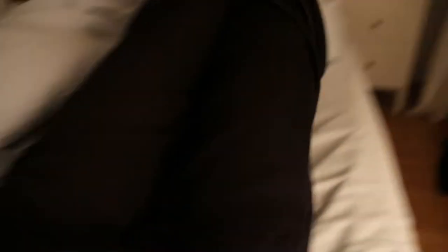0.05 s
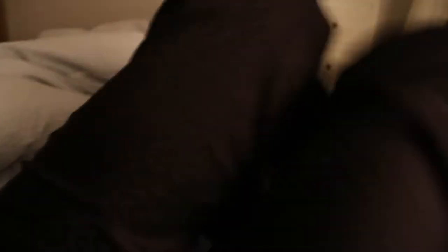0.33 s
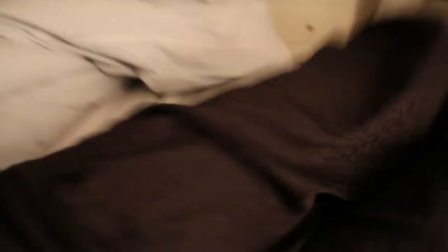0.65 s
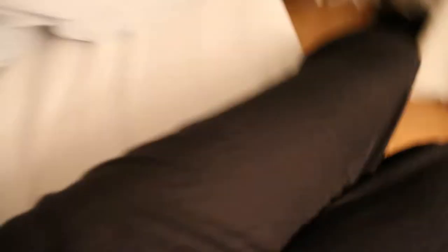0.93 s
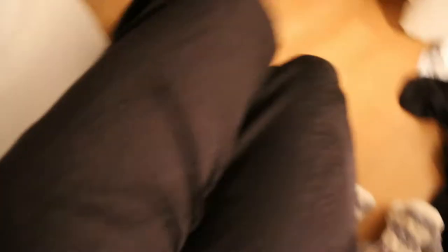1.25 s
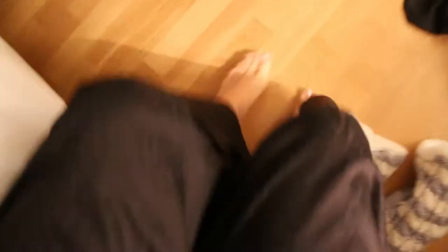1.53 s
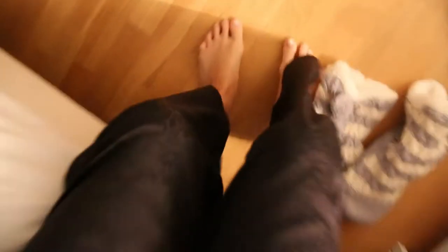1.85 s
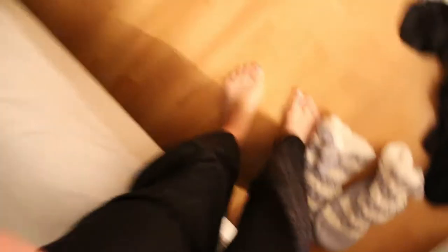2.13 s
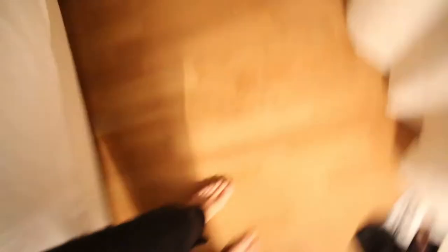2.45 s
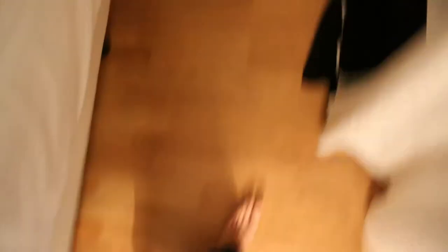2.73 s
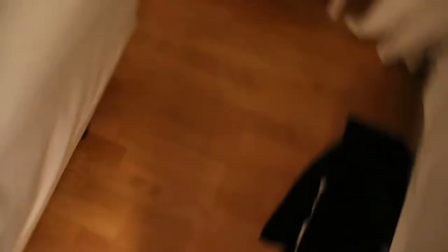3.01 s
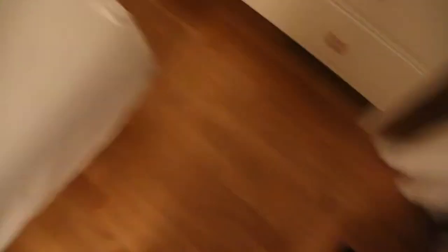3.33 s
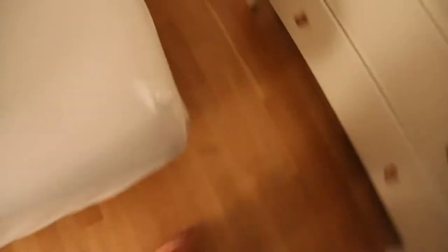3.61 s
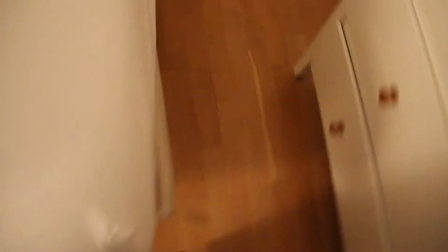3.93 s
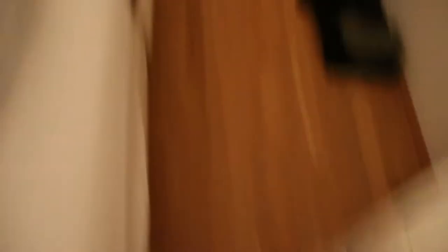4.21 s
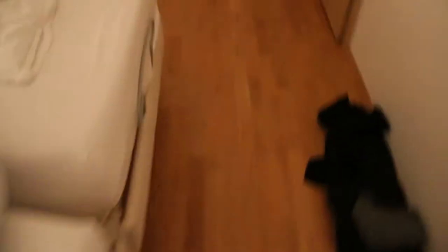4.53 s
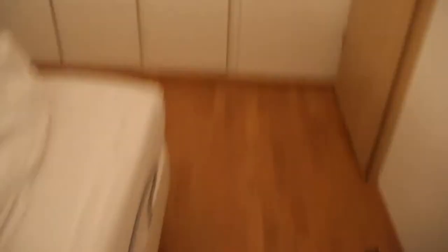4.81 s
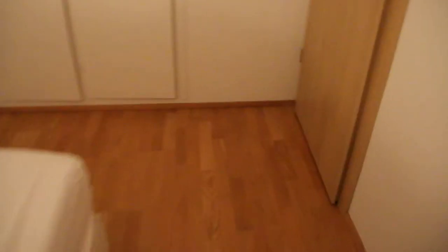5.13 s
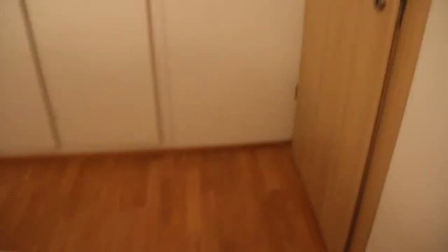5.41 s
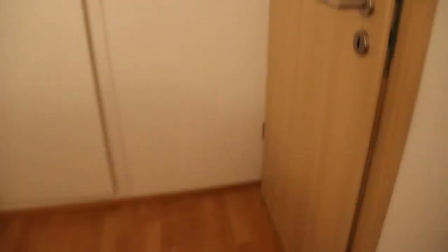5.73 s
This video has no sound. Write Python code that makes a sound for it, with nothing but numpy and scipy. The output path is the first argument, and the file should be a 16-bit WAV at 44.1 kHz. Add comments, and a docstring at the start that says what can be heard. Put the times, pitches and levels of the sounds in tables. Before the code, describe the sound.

Cloth rustles as someone slides off a duvet, then soft barefoot steps and brushing trousers, with close handling clicks and knocks.

```python
"""In a small, quiet bedroom someone slides off a duvet: folds flop and swish, and a knee zips over the weave.
From 0.6 s the camera in their hand ticks, knocks and scrapes under the fingers, close to its two
microphone ports. Bare feet load the sprung wooden floor as they stand up. The duvet dies away, and from
about 2.8 s trouser legs brush with the walk. At 3.4 s a strap ring tinkles once and the buckle hits
the housing; the soft steps and the handling carry on to the end."""
import sys
import numpy as np
from scipy import signal
from scipy.fft import rfft, irfft, next_fast_len
from scipy.io import wavfile
from scipy.ndimage import map_coordinates

SR = 44100
rng = np.random.default_rng(int(sys.argv[2]) if len(sys.argv) > 2 else 0)


def output_pcm(signal):
    """Save a mono or channel-first signal as 16-bit PCM at the path in sys.argv[1].

    Samples are clipped to [-1, 1] before scaling.
    """
    pcm = np.clip(np.atleast_2d(signal).T, -1, 1) * 32767
    wavfile.write(sys.argv[1], SR, np.round(pcm).astype(np.int16))


N = 262836

# Noise colours. Each row: frequency in Hz, relative spectral level in dB.
ROOM_TONE_EQ = [(25, -7), (60, -4.5), (130, -3.5), (265, -2), (380, -4.5), (520, -3.5), (800, -7),
                (1500, -12.5), (4000, -12.5), (9000, -16), (16000, -25.5)]  # room tone and hiss
FOLD_EQ = [(30, -30), (60, -5), (115, -4), (160, -5.5), (215, -1.5), (330, -4), (480, -3.5), (750, -9.5),
           (1300, -14), (3000, -38)]  # soft, tumbling folds
WEAVE_EQ = [(250, -24), (600, -4), (1000, -1), (1500, -2.5), (2200, -1), (3500, -5.5), (5500, -15),
            (9000, -41), (16000, -46)]  # weave rubbing on weave
FIBRE_EQ = [(1500, -21), (4000, 5.5), (6000, 4.5), (9000, 1), (12000, -3), (16000, -13)]  # the fizz of loose fibres
GRIP_EQ = [(60, -30), (130, -3.5), (230, 2.5), (400, -6), (900, -1.5), (1500, -4.5), (2000, -7), (3400, -2),
           (4300, -8), (6200, -14), (8000, -15.5), (11000, -28.5), (16000, -37)]  # skin on the camera body
BOARD_EQ = [(20, -25), (40, -14), (65, -1), (110, -5), (170, -37), (300, -18), (900, -23), (3000, -67)]  # rumbling floorboards
# Stereo images. Each row: frequency in Hz, left-right likeness (1 is mono, 0 is fully wide).
ROOM_TONE_IMAGE = [(100, 0.58), (400, 0.59), (1500, 0.075), (5000, 0)]
AIR_IMAGE = [(100, 0.99), (500, 0.98), (1200, 0.85), (2500, 0.44), (5000, 0.021), (12000, .02)]  # sound through the air
BODY_IMAGE = [(200, .94), (700, .85), (1500, .5), (3000, .03), (8000, .22)]  # sound through the housing
# The slide off the duvet. Each row: time in seconds, sliding speed as dB, weight on the folds as dB.
DUVET_SLIDE = [(0, -47.5, -48), (.2, -45, -49.5), (.35, -45.5, -50), (.5, -47.5, -45), (.7, -47.5, -45),
               (.95, -44.5, -44.5), (1.12, -47.5, -44.5), (1.23, -55.5, -48), (1.55, -50, -46.5),
               (1.76, -42.5, -41), (1.95, -46.5, -46), (2.04, -52.5, -54), (2.2, -55, -54.5),
               (2.45, -61.5, -73), (2.7, -70, -85)]
# A knee dragging over the ribbed weave. Each row: time in seconds, pitch in Hz, level in dB.
KNEE_ZIP = [(.08, 2300, -66), (.18, 2450, -52), (.28, 2590, -47), (.34, 2630, -48.5), (.42, 2480, -56),
            (.5, 2300, -90)]
# Single folds of cloth. Each row: start in seconds, length in seconds, level in dB, centre in Hz.
FOLD_SWISHES = [(0.119, 0.21, -46.5, 169), (0.246, 0.26, -46.5, 4780), (.468, 0.043, -43, 212),
                (0.823, 0.069, -37.5, 180), (1.229, .1, -46.5, 425), (1.457, 0.063, -45, 230),
                (1.451, .085, -49, 9500), (1.545, 0.056, -45.5, 252), (3.205, 0.08, -50.5, 5700),
                (3.718, 0.071, -48, 308), (3.767, 0.081, -48.5, 6400), (4.258, 0.21, -49, 1800),
                (5.305, 0.089, -48.5, 3960), (5.868, 0.059, -48.5, 807)]
# Dry plastic ticks. Each row: start in seconds, level in dB, centre in Hz, 60 dB decay in seconds.
PLASTIC_TICKS = [(0.6104, -33, 4260, 0.02), (0.7708, -42, 4550, 0.019), (1.1415, -45.5, 5060, 0.0059),
                 (1.6888, -43.5, 3060, 0.018), (2.731, -40.5, 2430, 0.013), (2.7444, -46.5, 2580, 0.0089),
                 (2.9273, -36, 2660, .011), (2.9465, -46, 5700, 0.0077), (3.2138, -39, 3550, .003),
                 (3.762, -30, 6200, 0.0082), (3.77, -41.5, 2970, 0.019), (3.789, -44.5, 3300, .019),
                 (3.924, -61, 5170, 0.014), (4.4511, -37.5, 2900, 0.019), (4.4948, -45.5, 5100, 0.012),
                 (5.4904, -34.5, 2850, 0.017), (5.4909, -40, 5850, 0.0038)]
# Dull knocks as the grip shifts. Each row: start in seconds, level in dB, pitch in Hz.
GRIP_KNOCKS = [(0.614, -21.5, 900), (1.2275, -25.5, 464), (1.242, -39, 457), (1.6861, -18, 900),
               (1.6909, -22, 277), (2.7322, -35, 420), (2.762, -25, 595), (2.906, -23, 500),
               (2.9103, -21.5, 385), (2.917, -20.5, 614), (2.9428, -19, 533), (2.932, -22.5, 260),
               (2.9541, -20, 730), (3.0338, -24, 960), (3.1854, -29, 500), (3.213, -27, 1410),
               (3.36, -30, 664), (3.7626, -16, 1090), (3.766, -22, 324), (3.856, -30, 444),
               (3.868, -33.5, 485), (4.025, -33.5, 452), (4.453, -21.5, 587), (4.4632, -13, 940),
               (4.4677, -24, 1050), (5.508, -19, 746), (5.599, -29.5, 576)]
# Resonances of the camera body. Each row: centre in Hz, Q, relative level in dB.
HOUSING_MODES = [(275.6, 21, 1), (590, 2.6, -9.5), (1085, 15, -1), (1635, 17, -4.5), (1934, 8.6, 4),
                 (2906, 9.5, -1.5), (3500, 30, -6), (6000, 15, -3)]
# Finger slips. Each row: start in seconds, length in seconds, level in dB, tilt in dB per octave.
FINGER_SLIPS = [(0.762, .068, -31.5, 0), (0.833, .067, -33.5, .5), (0.918, 0.086, -33.5, 1),
                (1.723, 0.045, -33, -.5), (1.799, 0.054, -36.5, 0), (2.117, 0.042, -41.5, 0),
                (2.278, 0.052, -40.5, -1), (2.515, 0.059, -40, -0.7), (2.678, 0.047, -39.5, -.5),
                (2.734, 0.046, -38.5, -2), (2.821, 0.021, -39, -2.5), (2.912, 0.064, -31, -0.2),
                (2.997, 0.057, -35.5, -0.2), (3.183, 0.011, -36.5, -3), (3.777, 0.038, -34, 3),
                (4.436, 0.078, -34, 1), (4.507, 0.08, -35.5, 1), (4.582, 0.09, -40.5, -.5),
                (4.715, .012, -40.5, -2), (5.475, 0.085, -33, 0.8), (5.526, 0.092, -36, 1)]
# Bare feet loading the boards. Each row: start in seconds, level in dB, 60 dB decay in seconds.
FOOTFALLS = [(0.799, -41, 0.51), (1.454, -41, 0.28), (1.673, -38.5, 0.62), (1.750, -32, 0.46),
             (3.343, -49.5, 0.85), (4.924, -39.5, 0.58), (5.394, -39.5, 0.58), (5.899, -56, 0.25)]
# Modes of the sprung floor. Each row: pitch in Hz, relative level in dB.
SPRUNG_FLOOR = [(47, -3), (60, -2), (84, -3.5), (112, -2.5)]
# Trouser legs swinging. Each row: fastest moment, rise and fall, all in seconds, level in dB,
# soft folds against the weave in dB.
LEG_SWINGS = [(2.872, 0.069, 0.052, -53.5, 9.5), (3.08, 0.23, 0.3, -55, 4.5),
              (3.41, 0.079, 0.12, -48.5, -1), (3.86, 0.031, 0.32, -56, 2),
              (4.06, 0.068, 0.098, -52.5, -4.5), (4.31, 0.086, 0.19, -50, -9.5),
              (4.57, 0.17, 0.15, -53, -5), (4.83, 0.15, 0.14, -61.5, 7), (4.928, 0.017, 0.11, -53, 3.5),
              (5.12, 0.12, 0.079, -54.5, -6), (5.37, 0.068, 0.097, -52, -2), (5.59, 0.18, 0.059, -56.5, 0),
              (5.95, 0.13, .1, -51.5, 1.5)]
# The strap's hardware. Each row: start in seconds, level in dB, part ("ring" or "buckle"),
# phase spread at the ports in radians, relative crack level in dB, lean to the right in dB.
STRAP_HITS = [(3.4064, -32.5, "ring", 0.58, -10, -0.5), (3.449, -19.5, "buckle", 0.29, -20, 2)]
# Modes of the ring and the buckle. Each row: pitch in Hz, relative level in dB, 60 dB decay in seconds.
RING_MODES = [(2376, 2, 0.047), (5160, 1.5, 0.05), (8730, -7, 0.052), (15180, -1.5, .015)]
BUCKLE_MODES = [(1090, -5.5, .023), (1370, 3.5, 0.011), (1750, -10, 0.033), (2070, 2, 0.022),
                (2425, -9, 0.044), (2770, -2, 0.026), (3230, -17, 0.028), (4040, -20, 0.023),
                (5400, -10, 0.019), (7700, -33, .018)]
# The bedroom's reverb. Each row: frequency in Hz, 60 dB decay in seconds.
ROOM_DECAY = [(150, 0.14), (1500, 0.24), (10000, 0.18)]


def amp(db):
    """Decibels to gain."""
    return 10 ** (np.asarray(db) / 20)


def unit(x):
    """Scale to rms 1."""
    return x / np.sqrt(np.mean(x ** 2) + 1e-20)


def along(points, hz):
    """Read (Hz, value) points on a log frequency axis."""
    freqs, values = np.transpose(points)
    return np.interp(np.log(hz + 1), np.log(freqs + 1), values)


def curves(rows):
    """Automation lanes: one value per sample for each column after the time."""
    times, *columns = np.transpose(rows)
    return [np.interp(np.arange(N) / SR, times, column) for column in columns]


def wobble(rate):
    """A smooth random curve, rate knots a second."""
    knots = rng.standard_normal(int(N * rate / SR) + 4)
    return map_coordinates(knots, [np.arange(N) * rate / SR])


def fade(t, t60):
    """Exponential decay, 60 dB down at t60."""
    return np.exp(-np.log(1000) * t / t60)


def add(track, start, sound):
    """Mix a sound into a track at start seconds."""
    part = track[..., round(start * SR):][..., :sound.shape[-1]]
    part += sound[..., :part.shape[-1]]


def filtered(x, response):
    """EQ x with a response given as a function of Hz."""
    n = x.shape[-1]
    padded = next_fast_len(n + SR // 8)
    hz = np.fft.rfftfreq(padded, 1 / SR)
    return irfft(rfft(x, padded) * response(hz), padded)[..., :n]


def resonance(hz, centre, q):
    """Causal band-pass response."""
    return 1j * hz * centre / q / (centre ** 2 - hz ** 2 + 1j * hz * centre / q)


def noise(n):
    """Two unrelated channels of white noise."""
    return rng.standard_normal((2, n))


def ports(pair, colour, image):
    """Turn two unrelated signals into a coloured left and right of rms 1 with the given image."""
    def mid_side(hz):
        width = np.arccos(np.clip(along(image, hz), -1, 1)) / 2
        return colour(hz) * np.array([np.cos(width), np.sin(width)])
    mid, side = filtered(pair, mid_side)
    return unit(np.array([mid + side, mid - side]))


def room_tone():
    """A steady bed of low room tone and microphone hiss."""
    return amp(-56) * ports(noise(N), lambda hz: amp(along(ROOM_TONE_EQ, hz)), ROOM_TONE_IMAGE)


def friction(eq, clump_db, clump_rate):
    """Countless tiny slips that come in clumps, rms 1."""
    slips = noise(N) * amp(clump_db * wobble(clump_rate))
    return ports(slips, lambda hz: amp(along(eq, hz)), AIR_IMAGE)


def cloth(stir_db=-62, duvet_fizz_db=-3.5, trouser_fizz_db=-7.5):
    """Folds tumble, the weave crinkles, loose fibres hiss: first the duvet, then each swing of a leg."""
    t = np.arange(N) / SR
    slide, weight = amp(curves(DUVET_SLIDE))
    legs = np.full(N, amp(stir_db))  # the trousers never quite rest
    leg_folds = np.zeros(N)
    for fastest, rise, fall, db, folds_db in LEG_SWINGS:
        swing = amp(db) * np.exp(-((t - fastest) / np.where(t < fastest, rise, fall)) ** 2)
        legs = np.hypot(legs, swing)
        leg_folds = np.hypot(leg_folds, amp(folds_db) * swing)
    folds = np.hypot(weight, leg_folds) * friction(FOLD_EQ, clump_db=2.5, clump_rate=90)
    weave = np.hypot(slide, legs) * friction(WEAVE_EQ, clump_db=1.5, clump_rate=510)
    fizz_level = np.hypot(amp(duvet_fizz_db) * slide, amp(trouser_fizz_db) * legs)
    fizz = fizz_level * friction(FIBRE_EQ, clump_db=0.5, clump_rate=1500)
    return folds + weave + fizz


def knee(width_hz=230):
    """Threads cross at a rate set by the sliding speed: a narrow, gliding band of noise."""
    pitch, level_db = curves(KNEE_ZIP)
    phase = 2 * np.pi * np.cumsum(pitch) / SR
    threads = [wobble(width_hz) * np.sin(phase) + wobble(width_hz) * np.cos(phase) for port in range(2)]
    return amp(level_db) * ports(np.array(threads), lambda hz: 1, AIR_IMAGE)


def stroke(rise, fall, colour, image, grain_db=2.0, grain_rate=600):
    """One slide: grainy friction, catching hundreds of times a second, that swells and dies."""
    t = np.arange(SR // 3) / SR
    grain = map_coordinates(rng.standard_normal(len(t)), [t * grain_rate])
    slips = ports(noise(len(t)) * amp(grain_db * grain), colour, image)
    attack = np.minimum(t / rise, 1)
    release = np.exp(-2.2 * (np.maximum(t - rise, 0) / fall) ** 2.46)
    return slips * attack * release


def swishes(rise_share=0.21):
    """A thick fold flops low; a thin, fast one swishes high."""
    out = np.zeros((2, N))
    for start, length, db, centre in FOLD_SWISHES:
        rise = rise_share * length
        colour = lambda hz: resonance(hz, centre, q=1.0) ** 2
        add(out, start, amp(db) * stroke(rise, length - rise, colour, AIR_IMAGE))
    return out


def ticks():
    """The housing lets go in a burst of micro-slips that excite one broad resonance."""
    out, t = np.zeros((2, N)), np.arange(SR // 20) / SR
    plastic = lambda hz: 1 / np.sqrt(1 + (hz / 10500) ** 4)  # plastic swallows the highest treble
    attack = 1 - np.exp(-t / 0.00018)
    for start, db, centre, t60 in PLASTIC_TICKS:
        burst = noise(len(t)) * fade(t, t60) * attack
        tick = ports(burst, lambda hz: resonance(hz, centre, q=0.97) ** 2 * plastic(hz), BODY_IMAGE)
        add(out, start, amp(db) * tick)
    return out


def housing(x, low_cut_hz=90):
    """The camera body passes no deep bass and adds its own resonances."""
    body = lambda hz: 1 + sum(amp(db) * resonance(hz, centre, q) for centre, q, db in HOUSING_MODES)
    low_cut = lambda hz: (1j * hz / (low_cut_hz + 1j * hz)) ** 2
    return filtered(x, lambda hz: 0.67 * body(hz) * low_cut(hz))


def knocks(push_cycles=6.634, rattle_cycles=41.3, dull_hz=2500):
    """A push on the body gives one or two strong cycles, dead centre, and a brief dull rattle."""
    out, t = np.zeros((2, N)), np.arange(SR // 16) / SR
    for start, db, pitch in GRIP_KNOCKS:
        colour = lambda hz: resonance(hz, pitch, q=1.3) / (1 + 1j * hz / dull_hz)
        rattle = ports(noise(len(t)), colour, BODY_IMAGE) * fade(t, rattle_cycles / pitch)
        push = np.sin(2 * np.pi * pitch * t) * fade(t, push_cycles / pitch)  # low knocks last longer
        add(out, start, amp(db) * (1.1 * push + 0.24 * rattle))
    return out


def fingers(catch_share=0.11, swell_share=0.24, rest_s=0.1):
    """Fingers scrape the body, each slip with its own brightness: from rest it catches, in a run it swells."""
    out, previous = np.zeros((2, N)), -np.inf
    for start, length, db, tilt in FINGER_SLIPS:
        rise = length * (catch_share if start - previous > rest_s else swell_share)
        colour = lambda hz: amp(along(GRIP_EQ, hz) + tilt * np.log2(hz + 1))
        add(out, start, amp(db) * stroke(rise, length - rise, colour, BODY_IMAGE))
        previous = start
    return out


def feet(settle_s=0.007, detune=0.047):
    """Soft heels set the sprung floor swinging and the boards rumbling."""
    load, swing, t = np.zeros(N), np.zeros(N), np.arange(SR) / SR
    for start, db, t60 in FOOTFALLS:
        weight = amp(db) * (1 - np.exp(-t / settle_s)) * fade(t, t60)
        floor = sum(amp(mode_db) * np.sin(2 * np.pi * hz * rng.normal(1, detune) * t)
                    for hz, mode_db in SPRUNG_FLOOR)
        add(load, start, weight)
        add(swing, start, weight * floor)
    rumble = ports(noise(N), lambda hz: amp(along(BOARD_EQ, hz)), AIR_IMAGE)
    return 0.58 * swing + 0.47 * load * rumble


def struck(modes, spread, crack_db):
    """A brief crack kicks modes into ringing; each reaches the two ports out of phase."""
    t = np.arange(SR // 6) / SR
    ringing = np.zeros((2, len(t)))
    for pitch, db, t60 in modes:
        port_phase = np.array([[1], [-1]]) * spread * rng.normal(1, 0.65)
        ringing += amp(db) * fade(t, t60) * np.cos(2 * np.pi * pitch * t + port_phase)
    crack_hz = modes[1][0]  # centred on the second mode
    crack = ports(noise(len(t)), lambda hz: resonance(hz, crack_hz, q=0.86), BODY_IMAGE)
    attack = 1 - np.exp(-t / 0.00005)
    return (ringing + amp(crack_db) * crack * fade(t, t60=0.05)) * attack


def strap():
    """The metal ring tinkles, then the buckle snaps against the camera."""
    out, modes = np.zeros((2, N)), {"ring": RING_MODES, "buckle": BUCKLE_MODES}
    for start, db, part, spread, crack_db, lean_db in STRAP_HITS:
        gains = amp([[db - lean_db], [db + lean_db]])
        add(out, start, gains * struck(modes[part], spread, crack_db))
    return out


def room(x):
    """The bedroom's short tail, each frequency dying at its own speed."""
    freqs, t, bands = signal.stft(noise(SR // 2), SR, nperseg=256)
    bands = bands * fade(t, along(ROOM_DECAY, freqs)[:, None])
    _, tail = signal.istft(bands, SR, nperseg=256)
    tail = ports(tail, lambda hz: 1, AIR_IMAGE) / np.sqrt(tail.shape[1])
    tail = np.pad(tail, ((0, 0), (SR // 200, 0)))  # 5 ms pre-delay
    return signal.fftconvolve(x, tail, axes=1)[:, :N]


def scene(lean_db=0.9, wet_db=-17):
    """The hand sits nearer the right port; its sounds are close, so the room answers only faintly."""
    handling = housing(ticks() + fingers() + knocks()) + strap()
    airborne = cloth() + swishes() + knee() + feet() + room_tone()
    return handling * amp([[-lean_db], [lean_db]]) + amp(wet_db) * room(handling) + airborne


def record(dry, top_hz=16200):
    """The camera keeps nothing above its band limit."""
    return filtered(dry, lambda hz: 1 / (1 + (hz / top_hz) ** 120))


dry = scene()
out = record(dry)
output_pcm(out)
```